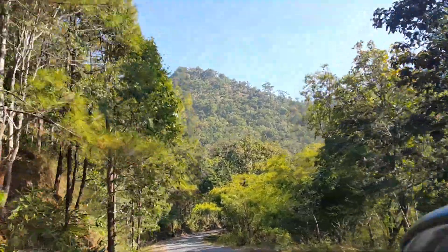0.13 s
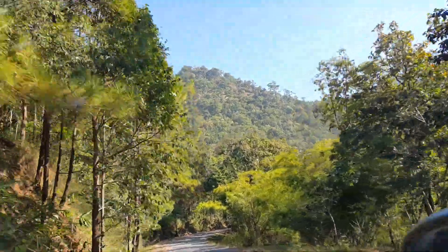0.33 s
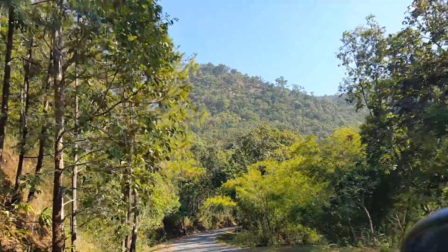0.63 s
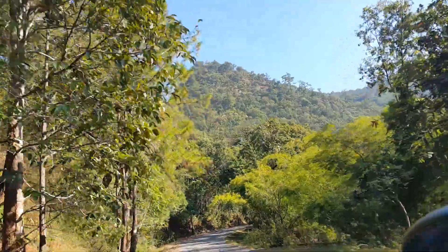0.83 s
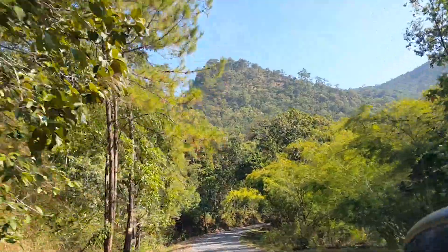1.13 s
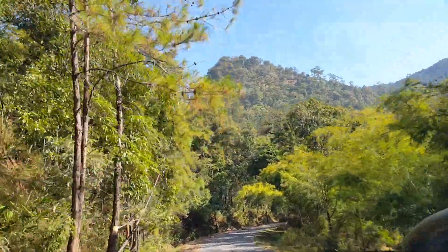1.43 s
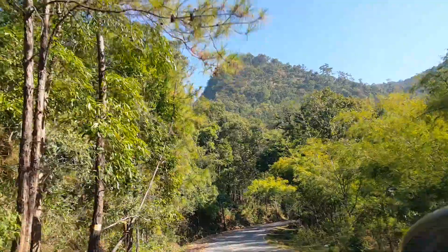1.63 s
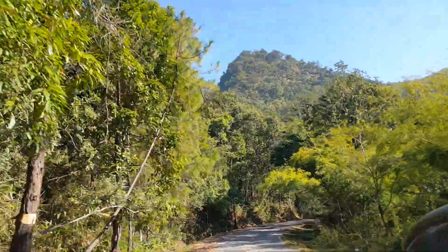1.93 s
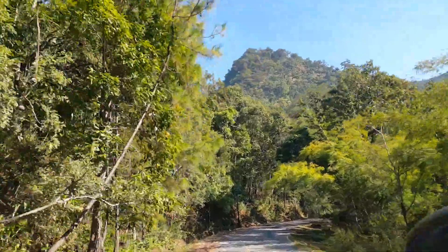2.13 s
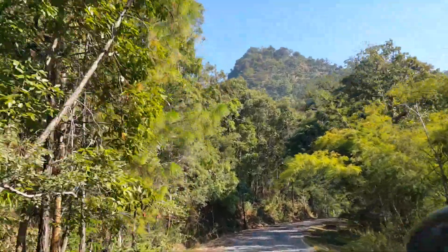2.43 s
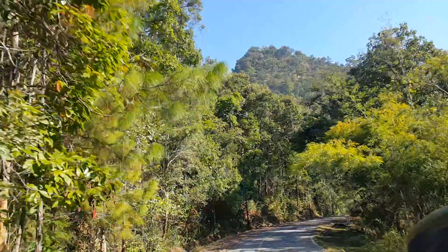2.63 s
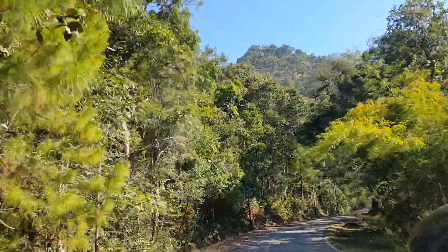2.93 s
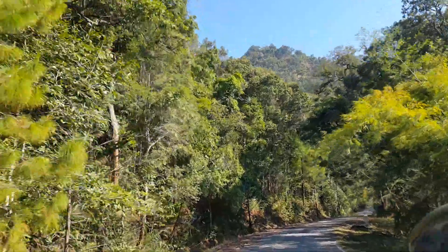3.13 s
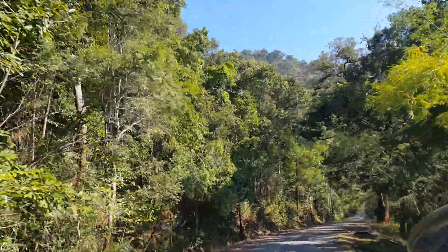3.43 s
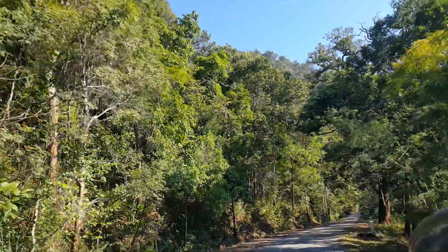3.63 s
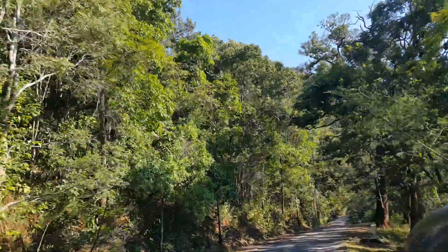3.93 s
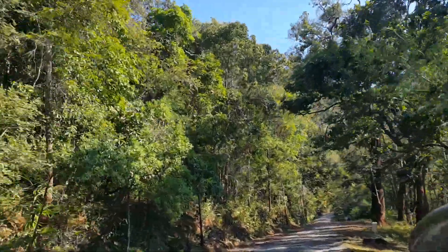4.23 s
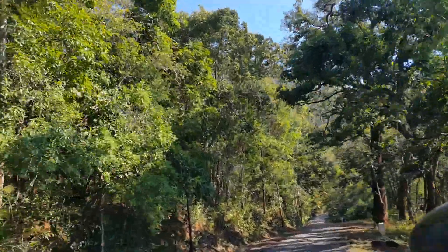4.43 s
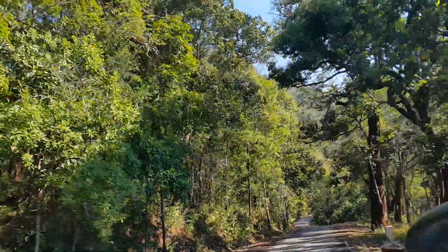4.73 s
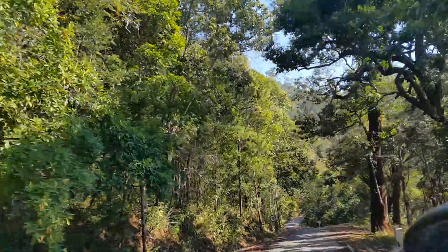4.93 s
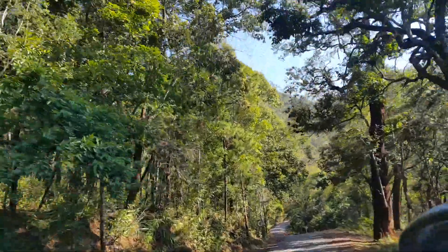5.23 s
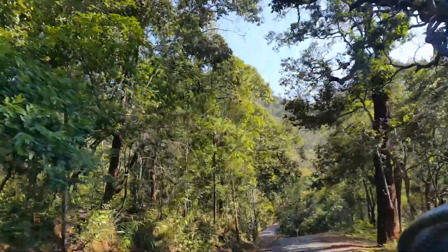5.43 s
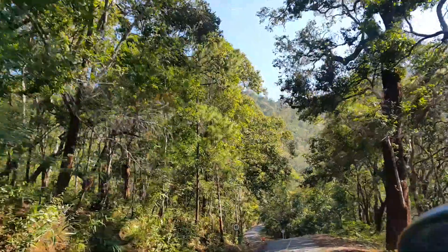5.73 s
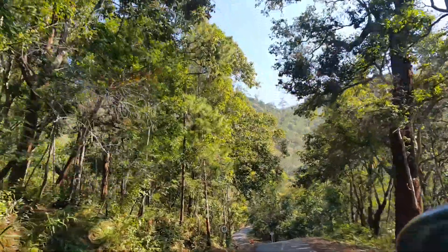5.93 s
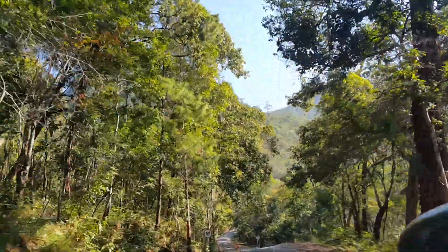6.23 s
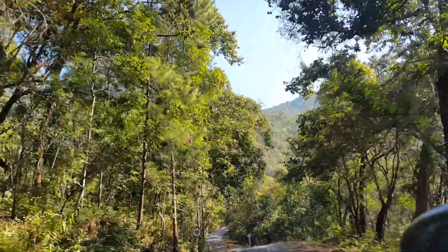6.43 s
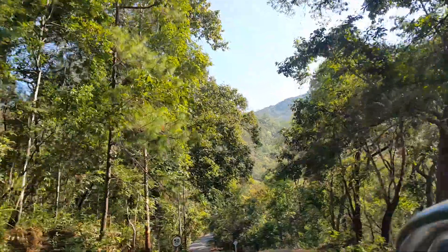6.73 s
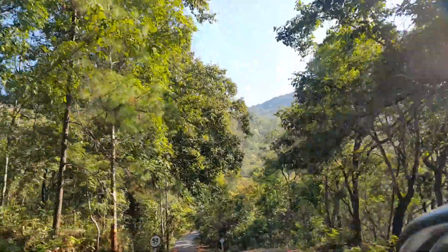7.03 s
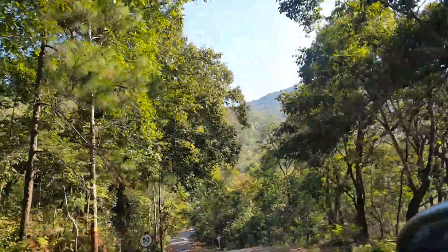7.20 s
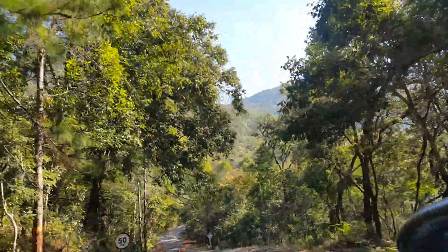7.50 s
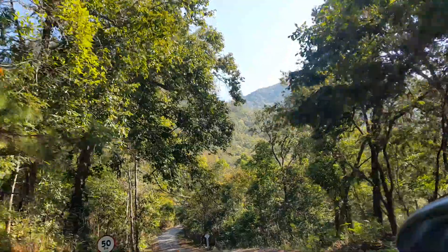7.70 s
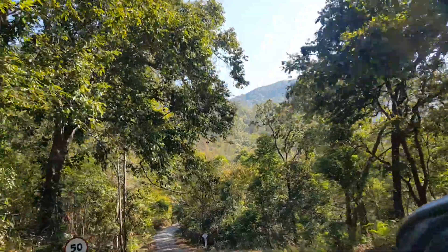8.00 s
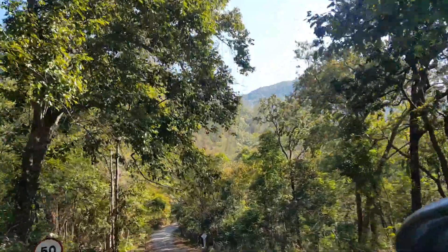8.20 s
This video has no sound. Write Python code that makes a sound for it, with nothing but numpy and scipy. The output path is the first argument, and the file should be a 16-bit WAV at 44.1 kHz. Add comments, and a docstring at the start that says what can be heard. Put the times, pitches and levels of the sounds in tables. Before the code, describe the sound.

Outdoors on a forest road, a microphone on a moving vehicle is held in the airstream. From 0 seconds, low wind rumble and fluttering puffs are broken by irregular short knocks, mostly left, over a muted rush of tyres and air. A faint gear whine near 1.9 kHz and a shrill, chirpy whistle near 3.5 kHz sit behind, with very faint high hiss gliding down. Around 1.3 to 2.1 seconds a gust crunches densely, with heavy thuds on the right, while rush and whistle peak. The whistle weakens after 2 seconds and is practically gone by 4. Hard single pops continue, some with dry crackling edges on the right. From about 5 seconds the thin hiss rises again, then falls after 6. Knocks crowd the right around 7 seconds; the whine sinks and the rush subsides towards 8.4, with wind knocks continuing.

```python
"""A vehicle runs along a forest road, its microphone held out in the airstream: turbulent pressure at two
ports gives a noise rumble, flutter and short shaped knocks, at first mostly left, with a dense gust near 1.7 s.
Filtered noise gives the rush of tyres and air, strongest about then; chirped flecks make a shrill whistle that
fades after it. Narrow noise bands form a gear whine that sinks and a thin hiss that falls, rises again from
about 5 s and falls once more; the knocks grow mostly right, and at the end the rush subsides."""
import sys
import numpy as np
from scipy import signal
from scipy.fft import rfft, irfft, next_fast_len
from scipy.io import wavfile

SR = 44100
rng = np.random.default_rng(int(sys.argv[2]) if len(sys.argv) > 2 else 0)


def persist_wave(psi):
    """Save psi, clipped to +-1, as 16-bit WAV."""
    counts = np.round(np.clip(psi, -1, 1) * 32767).astype(np.int16)
    wavfile.write(sys.argv[1], SR, np.atleast_2d(counts).T)


N = 368668
TIME = np.arange(N) / SR  # s


def gain_of(db):
    """Logarithmic level: converts decibels to an amplitude ratio."""
    return 10 ** (np.asarray(db) / 20)


def evened(x):
    """Power normalization: scales each channel to rms 1."""
    return x / np.sqrt(np.mean(x ** 2, axis=-1, keepdims=True) + 1e-20)


def follow(rows):
    """Linear interpolation: the columns of a time curve at every sample."""
    s, *columns = np.transpose(rows)
    return np.array([np.interp(TIME, s, c) for c in columns])


def colour(x, points):
    """Linear filtering: multiplies the spectrum of x by a gain drawn on a log-frequency axis."""
    size = next_fast_len(x.shape[-1], real=True)
    f, db = np.transpose(points)
    hz = np.fft.rfftfreq(size, 1 / SR)
    gain = gain_of(np.interp(np.log(hz + 1), np.log(f), db))
    return irfft(rfft(x, size) * gain, size)[..., :x.shape[-1]]


def wander(rate_hz):
    """Band-limited random fluctuation: Gaussian-lowpassed noise of rms 1, independent at each port."""
    size = next_fast_len(N, real=True)
    hz = np.fft.rfftfreq(size, 1 / SR)
    lowpass = np.exp(-.5 * (hz / rate_hz) ** 2)
    return evened(irfft(rfft(rng.standard_normal((2, size))) * lowpass, size)[:, :N])


def sides(left_db):
    """Interchannel level difference: gains of the two ports for a left-minus-right level."""
    return gain_of([[left_db / 2], [-left_db / 2]])


def add(mix, s, sound):
    """Superposition: adds a sound to one channel, centred on the time s."""
    start = round(s * SR) - len(sound) // 2
    sound = sound[max(-start, 0):]
    part = mix[max(start, 0):][:len(sound)]
    part += sound[:len(part)]


def fuzzy_tone(rows, width_hz, left_db):
    """Quadrature modulation: random sidebands widen a gliding tone into a narrow band of noise."""
    hz, db = follow(rows)
    phase = 2 * np.pi * np.cumsum(hz) / SR
    band = wander(width_hz) * np.cos(phase) + wander(width_hz) * np.sin(phase)
    return gain_of(db) * sides(left_db) * band


def snaps(rows, half_s, octaves):
    """Time-frequency localization: very short sprays of noise, each about its own centre frequency."""
    size = 1024
    t, hz = (np.arange(size) - size // 2) / SR, np.fft.rfftfreq(size, 1 / SR)
    envelope = np.exp(-.5 * (t / half_s) ** 2)
    out = np.zeros(N)
    for (s, db, centre_hz), chance in zip(rows, rng.standard_normal((len(rows), size))):
        band = np.exp(-.5 * (np.log2((hz + 1) / centre_hz) / octaves) ** 2)
        add(out, s, gain_of(db) * evened(irfft(rfft(chance) * band)) * envelope)
    return out


def bursts(rows, left_steepness=4.88, right_steepness=5.67, squareness=1.55, attack=3.8, extent=1.69,
           leak_hz=70, edge_s=0.00076, lead=0.78, ceiling=0.84, soft_hz=4200):
    """Turbulent pressure at one port: each eddy is a noise body of milliseconds with one early crisp edge."""
    # response of the ports: f/Hz, relative level/dB
    port_colour = [(20, -35), (60, -19), (120, 0.5), (220, -0.5), (1400, -2.5), (2000, -3), (3000, -8.5),
                   (4000, -14.5), (5000, -28.5), (6500, -40), (16000, -44.5)]
    # spectrum of the crisp edge: f/Hz, relative level/dB
    edge_colour = [(300, -23), (900, -3), (1600, 10), (2200, 4), (3000, -4), (4000, -18.5), (5000, -37.5),
                   (6500, -51.5), (16000, -51.5)]
    s, port, db, half, bright_hz = np.transpose(rows)[:, :, None]

    # the edge's share rises with brightness and falls with level
    crisp_db = db - 26 + 21 * np.log2(bright_hz / 758)  # 21 dB per octave
    crisp_db = crisp_db - 0.38 * (db + 11.5)  # dB per dB above -11.5 dB
    crisp_db = crisp_db + 1.0 * rng.standard_normal(db.shape)  # scatter, dB

    size = 2048
    coarse, fine = rng.standard_normal((len(rows), 2, size)).swapaxes(0, 1)
    t, hz = (np.arange(size) - size // 2) / SR, np.fft.rfftfreq(size, 1 / SR)

    def sized(x, level_db, half_s):
        """Energy equivalence: gives each row the energy of a bell of that height and half length."""
        bell = np.sqrt(np.sqrt(2 * np.pi) * half_s * SR / size)
        return gain_of(level_db) * bell * evened(x)

    shape = np.where(t < 0, attack * squareness, squareness)  # it starts more abruptly than it ends
    swirl = rfft(coarse * np.exp(-abs(t / (extent * half)) ** shape))
    steepness = np.where(port > .5, right_steepness, left_steepness)
    swirl /= np.sqrt(1 + (hz / bright_hz) ** steepness)  # brighter eddies reach higher
    body = colour(irfft(swirl), port_colour)
    body = signal.lfilter(*signal.butter(2, leak_hz, "high", fs=SR), body)  # slow swing back

    age = t + lead * half  # the edge comes early and dies away
    edge_envelope = np.exp(-np.maximum(age, -1.8 * age) / np.sqrt(edge_s * half))
    edge = colour(fine * edge_envelope, edge_colour)
    sound = sized(body, db, half) + sized(edge, crisp_db, half)

    # the narrow port rounds off the largest swings; only the lower part of that change is kept
    pressed = ceiling * np.tanh(sound / ceiling) - sound
    sound = sound + signal.sosfiltfilt(signal.butter(2, soft_hz, fs=SR, output="sos"), pressed)
    out = np.zeros((2, N))
    for when, side, one in zip(s[:, 0], port[:, 0], sound):
        add(out[int(side > .5)], when, one)
    return out


def knocks():
    """Impulsive turbulent pressure: the strongest eddies strike the ports one by one."""
    # strong eddies: t/s, port (0 left, 1 right), relative level/dB, half length/s, brightness f/Hz
    eddies = [(0.0124, 1, -14, 0.0014, 730), (0.023, 0, -24.5, 0.0038, 1320),
              (0.037, 0, -26.5, 0.0033, 1350), (0.105, 0, -19.5, 0.0048, 960), (0.124, 1, -16, 0.0018, 755),
              (0.1484, 0, -18.5, 0.002, 950), (0.18, 0, -11.5, 0.00033, 1560),
              (0.273, 0, -24.5, 0.0024, 1170), (0.306, 1, -7.5, 0.0014, 603),
              (0.3852, 0, -22, 0.0025, 1210), (0.3855, 1, -12, 0.0012, 605), (0.416, 0, -21, 0.0049, 1340),
              (0.4873, 0, -17, 0.0023, 1200), (0.599, 0, -18, 0.0011, 1400), (0.829, 0, -26, 0.0024, 1180),
              (0.8444, 1, -6, 0.00036, 376), (0.8483, 0, -9, 0.00051, 980), (0.89, 0, -21, 0.0054, 1000),
              (0.9585, 0, -12, 0.00078, 1000), (0.9585, 1, -18, 0.00088, 500),
              (0.994, 0, -10.5, 0.0017, 1170), (1.017, 1, -9.5, 0.0011, 430),
              (1.036, 0, -14.5, 0.00075, 970), (1.048, 0, -12, 0.00076, 1090),
              (1.097, 0, -12, 0.00068, 1110), (1.1526, 0, -13, 0.00062, 735),
              (1.213, 0, -14.5, 0.00068, 706), (1.2803, 0, -13.5, 0.0019, 1130),
              (1.371, 0, -23, 0.0031, 1020), (1.392, 0, -8.5, 0.0012, 850),
              (1.412, 0, -11.5, 0.00048, 1060), (1.4355, 1, -12, 0.0014, 520), (1.47, 0, -15, 0.0006, 1160),
              (1.5672, 0, -19, 0.0019, 1130), (1.641, 0, -21.5, 0.0032, 700), (1.657, 1, -10, 0.0024, 540),
              (1.6644, 0, -17, 0.0023, 650), (1.6836, 0, -19.5, 0.0027, 780),
              (1.715, 0, -13.5, 0.0013, 1090), (1.7325, 1, -6.5, 0.0019, 1010),
              (1.752, 0, -14.5, 0.0013, 940), (1.7579, 1, -8, 0.00044, 750), (1.7603, 0, -15, 0.0017, 850),
              (1.78, 1, -11.5, 0.0019, 600), (1.808, 1, -16, 0.00097, 426), (1.875, 0, -14.5, 0.0046, 850),
              (1.8978, 0, -8, 0.00071, 860), (1.928, 0, -6.5, 0.001, 1050), (1.973, 0, -14.5, 0.002, 700),
              (2.006, 0, -16, 0.0034, 1190), (2.024, 0, -9.5, 0.0011, 1560), (2.0603, 1, -12, 0.002, 630),
              (2.0646, 0, -14, 0.0011, 550), (2.103, 0, -13.5, 0.0016, 980), (2.182, 0, -24, 0.0023, 750),
              (2.2089, 0, -23.5, 0.0015, 1200), (2.341, 0, -22.5, 0.0025, 1040),
              (2.537, 1, -12.5, 0.0021, 450), (2.5733, 0, -7, 0.00072, 1350), (2.5782, 1, 1, 0.00059, 690),
              (2.6054, 0, -20.5, 0.0026, 1240), (2.6102, 1, -18.5, 0.0022, 393),
              (2.661, 0, -19.5, 0.0031, 1030), (2.7078, 0, -5, 0.0005, 1340),
              (2.789, 0, -21.5, 0.0031, 1190), (2.818, 0, -14, 0.0021, 860),
              (2.9146, 1, -11.5, 0.0013, 553), (2.967, 0, -18, 0.0024, 680), (2.977, 1, -8.5, 0.0023, 870),
              (3.1526, 1, -3, 0.00052, 450), (3.184, 0, -21, 0.0015, 590), (3.2156, 1, -6, 0.0016, 730),
              (3.2415, 0, -12, 0.00065, 1500), (3.2571, 0, -14, 0.0016, 930), (3.3, 1, -6, 0.0012, 890),
              (3.3732, 1, -18, 0.0028, 600), (3.404, 0, -10.5, 0.0011, 830), (3.4495, 0, -12, 0.0021, 1280),
              (3.474, 0, -19, 0.0017, 1270), (3.504, 1, -12, 0.0016, 710), (3.661, 1, -9, 0.001, 423),
              (3.718, 1, -7.5, 0.0015, 625), (3.777, 0, -18.5, 0.0024, 1030),
              (3.789, 1, -19.5, 0.0014, 800), (3.81, 0, -14, 0.0011, 1100), (3.828, 0, -15.5, 0.0019, 1370),
              (3.832, 1, -21, 0.0012, 1100), (3.8695, 1, -4, 0.002, 940), (3.909, 0, -18.5, 0.0038, 900),
              (3.942, 1, -11.5, 0.0023, 1070), (4.038, 0, -17.5, 0.0029, 1020),
              (4.039, 1, -13.5, 0.0021, 505), (4.053, 1, -11, 0.00083, 403),
              (4.0763, 0, -12, 0.00045, 1480), (4.0927, 0, -24, 0.0021, 680),
              (4.1076, 0, -19.5, 0.0018, 1000), (4.1315, 0, -16.5, 0.0032, 1170),
              (4.191, 0, -15.5, 0.001, 780), (4.257, 1, -21, 0.0025, 364), (4.318, 1, -10, 0.0014, 344),
              (4.4057, 0, -21, 0.0017, 920), (4.473, 0, -17.5, 0.0024, 1360),
              (4.541, 1, -4.5, 0.00083, 397), (4.59, 0, -10.5, 0.00069, 940),
              (4.641, 0, -15.5, 0.0012, 1020), (4.727, 0, -23, 0.0066, 950), (4.746, 1, -9, 0.00074, 540),
              (4.8856, 1, -12, 0.0026, 850), (4.89, 0, -20, 0.0023, 600), (4.907, 1, 0, 0.00086, 1120),
              (4.9223, 1, -10.5, 0.0011, 590), (4.951, 0, -22, 0.0037, 860), (4.9696, 0, -19, 0.0019, 880),
              (5.007, 1, -13.5, 0.00088, 745), (5.009, 0, -15, 0.0008, 920), (5.0697, 0, -23, 0.0018, 1100),
              (5.0835, 1, -15, 0.002, 1090), (5.098, 1, -20, 0.0045, 800), (5.2586, 1, -17, 0.0026, 970),
              (5.284, 0, -10.5, 0.00094, 920), (5.32, 1, -0.5, 0.0017, 524), (5.4746, 1, -24, 0.0028, 960),
              (5.511, 1, -16.5, 0.0029, 660), (5.5308, 1, -6.5, 0.0016, 825), (5.5756, 1, -6, 0.0016, 674),
              (5.606, 1, -10.5, 0.001, 430), (5.61, 0, -18.5, 0.0012, 680), (5.6393, 1, -6.5, 0.0017, 870),
              (5.6934, 0, -20.5, 0.0015, 1200), (5.7075, 0, -25.5, 0.0029, 1400),
              (5.7264, 1, -22.5, 0.0055, 794), (5.738, 1, -7.5, 0.0026, 1060), (5.848, 1, -8.5, 0.002, 770),
              (5.8748, 1, -20.5, 0.0015, 750), (5.949, 1, -11.5, 0.0014, 380), (5.967, 1, -6, 0.0016, 1000),
              (6.0568, 1, -6, 0.0011, 720), (6.0655, 1, -15, 0.0013, 1200), (6.101, 1, -13, 0.0014, 510),
              (6.128, 1, -23, 0.0015, 780), (6.154, 1, -11.5, 0.0011, 960), (6.1776, 1, -4, 0.0014, 564),
              (6.1785, 0, -16.5, 0.0018, 1120), (6.2107, 1, -10.5, 0.0011, 517),
              (6.2182, 0, -13, 0.0005, 1170), (6.312, 1, -14, 0.0022, 495), (6.35, 0, -19.5, 0.0016, 670),
              (6.369, 0, -28, 0.002, 950), (6.3893, 1, -15, 0.003, 1030), (6.478, 1, -10.5, 0.0026, 700),
              (6.484, 1, -11, 0.0019, 1020), (6.6098, 1, -9, 0.002, 1460), (6.6618, 1, -20, 0.0021, 680),
              (6.6775, 0, -22, 0.00065, 1450), (6.7074, 1, -10, 0.00076, 490), (6.721, 0, -20, 0.0018, 920),
              (6.7365, 1, -6.5, 0.0014, 960), (6.8174, 1, -17, 0.0017, 520), (6.854, 1, -8, 0.0014, 695),
              (6.8832, 0, -28, 0.0038, 1210), (6.8833, 1, -9.5, 0.0031, 873),
              (6.8923, 0, -23, 0.00081, 1330), (6.901, 1, -8.5, 0.0035, 540),
              (6.923, 1, -6.5, 0.00066, 805), (6.9277, 0, -16, 0.0012, 890), (6.945, 1, -17, 0.0019, 950),
              (6.954, 1, -9.5, 0.00094, 790), (6.98, 0, -10, 0.00044, 1110), (6.992, 1, -2.5, 0.0014, 970),
              (7.0144, 0, -16, 0.003, 1320), (7.0372, 0, -23, 0.0025, 1060), (7.086, 0, -13, 0.0014, 690),
              (7.126, 1, -3, 0.0019, 880), (7.151, 1, -6, 0.0012, 850), (7.162, 0, -16, 0.0025, 940),
              (7.202, 0, -20, 0.0018, 1350), (7.2172, 0, -18.5, 0.0027, 680), (7.223, 1, -5.5, 0.0011, 770),
              (7.2309, 0, -23, 0.00083, 1280), (7.246, 0, -19, 0.0026, 754),
              (7.2806, 1, -15.5, 0.0024, 940), (7.301, 1, -13, 0.0036, 620), (7.388, 1, -17.5, 0.0024, 540),
              (7.4267, 0, -22, 0.0028, 1220), (7.448, 1, -21, 0.0023, 700), (7.4655, 0, -27, 0.0018, 1150),
              (7.516, 0, -14.5, 0.0014, 920), (7.573, 1, -4.5, 0.0016, 1080),
              (7.584, 1, -6.5, 0.00081, 1140), (7.6223, 1, -16, 0.001, 520), (7.6421, 1, -8, 0.0013, 564),
              (7.672, 1, -18, 0.0011, 850), (7.6915, 1, -4, 0.0015, 900), (7.74, 1, -11.5, 0.0012, 714),
              (7.7959, 1, -9.5, 0.0011, 510), (7.7987, 0, -15, 0.00083, 1000),
              (7.8555, 1, -7.5, 0.0014, 1190), (7.863, 1, -6, 0.002, 1150), (7.9113, 1, -11, 0.00099, 584),
              (7.981, 0, -20, 0.0019, 683), (7.9833, 1, -20, 0.0025, 345), (8.0546, 0, -24.5, 0.0018, 750),
              (8.118, 1, -7.5, 0.0019, 740), (8.158, 0, -14, 0.00045, 1040), (8.166, 1, -11.5, 0.0021, 910),
              (8.2232, 1, -6.5, 0.002, 920), (8.2442, 0, -13.5, 0.0013, 1030), (8.261, 1, -17, 0.0025, 606),
              (8.295, 0, -23.5, 0.0011, 1400), (8.301, 1, -11, 0.0013, 710)]
    return bursts(eddies)


def shoves(cycles=0.37):
    """Inertial displacement of air: the largest eddies push a port one way, then back, as a dull thud."""
    # heavy shoves of air: t/s, port (0 left, 1 right), relative level/dB, swing f/Hz
    pushes = [(1.4923, 0, -9, 150), (1.635, 1, -8, 218), (1.685, 1, -11, 332), (1.7292, 1, -4.5, 165),
              (1.7817, 1, -5, 418), (1.8075, 1, -3.5, 190), (1.82, 1, -13, 171), (2.017, 1, -19, 180),
              (2.1779, 1, -10.5, 170), (2.9789, 1, -5.5, 303), (3.047, 1, -10, 274), (3.154, 1, -9, 258),
              (3.219, 1, -1.5, 205), (3.244, 0, -12, 210), (3.4007, 0, -12.5, 200), (3.7829, 1, -8, 190),
              (4.0557, 1, -6, 200), (4.5413, 1, -10, 240), (4.7134, 1, -12, 190), (4.7583, 1, -12, 232),
              (5.0817, 1, -7, 180), (5.3241, 1, -7.5, 392), (5.6423, 1, -5, 217), (6.207, 1, -8, 200),
              (7.385, 1, -11.5, 201), (7.8285, 1, -12, 180)]
    out, t = np.zeros((2, N)), np.arange(-1024, 1024) / SR
    for s, port, db, hz in pushes:
        swing = np.sin(2 * np.pi * hz * t) * np.exp(-.5 * (hz * t / cycles) ** 2)
        add(out[int(port > .5)], s, gain_of(db) * swing)
    return out


def cracks(crack_hz=4400, spray_hz=12500, wide_hz=8000, wide_db=-16.0):
    """Overload distortion: hard knocks at the right port add a dry crack, a wide skirt and a treble spray."""
    # overloads of the right port: t/s, dry crack level/dB, bright spray level/dB
    overloads = [(2.577, -40, -58), (3.216, -39, -47), (3.871, -35, -52), (4.9075, -51, -75),
                 (5.3215, -40, -64), (5.575, -44, -62), (5.6385, -38, -52), (5.642, -38, -33.5),
                 (5.741, -44, -59), (6.61, -46, -68), (6.737, -46, -56), (6.882, -37, -53),
                 (6.992, -34.5, -53), (7.125, -47, -55), (7.5723, -32.5, -53), (7.857, -45, -57)]
    crack = snaps([(s, db, crack_hz) for s, db, _ in overloads], half_s=0.00035, octaves=0.24)
    skirt = snaps([(s, db + wide_db, wide_hz) for s, db, _ in overloads], half_s=0.0003, octaves=0.55)
    spray = snaps([(s, db, spray_hz) for s, _, db in overloads], half_s=0.00042, octaves=0.22)
    return crack + skirt + spray


def gust(at_s=1.73, length_s=0.78, peak_db=-29.5, fade_db=5.0, spread_db=6.0,
         left_hz=980, right_hz=560, half_s=0.0008, count=130):
    """Turbulent breakup: one long gust becomes a dense crunch of tiny eddies, hardest at its middle."""
    place = 2 * (np.arange(count) + rng.random(count)) / count - 1  # -1 start, 1 end
    port = rng.random(count) < .35  # about a third on the right
    db = peak_db - fade_db * place ** 2
    db = db + spread_db * np.clip(rng.standard_normal(count), -2, 2)
    s = at_s + place * length_s / 2
    hz = np.where(port, right_hz, left_hz)
    return bursts(np.transpose([s, port, db, np.full(count, half_s), hz]))


def airflow(gust_db=2.5, gust_hz=3.3):
    """Unsteady flow: the wind level at each port in dB, slow swells with quick gusts on top."""
    # strength of the buffeting before gusts: t/s, left relative level/dB, right relative level/dB
    swell = [(0.0, -30.5, -31), (0.64, -33, -34.5), (0.96, -29, -30.5), (1.12, -31.5, -36),
             (1.3, -28, -30.5), (1.5, -23, -29.5), (1.7, -27.5, -28.5), (1.95, -25, -26.5), (2.4, -29, -32),
             (4.0, -29.5, -29.5), (4.48, -30.5, -34), (4.8, -33.5, -30.5), (5.28, -27.5, -30.5),
             (5.44, -33, -32), (6.56, -30, -32), (6.88, -33, -26.5), (7.52, -26, -29.5), (7.84, -27.5, -31),
             (8.0, -34.5, -34), (8.32, -30, -35.5)]
    return follow(swell) + gust_db * np.clip(wander(gust_hz), -2, 2)


def patter(wind_db, level_db=-2.0, spread_db=0.5, most_db=2.0, top_db=-22.0, left_hz=830, right_hz=440,
           spread=0.22, half_s=0.0012, clump_db=4.0, clump_hz=14, count=600):
    """Intermittency of turbulence: lesser eddies come in uneven clumps, their level following the wind."""
    density = gain_of(clump_db * np.clip(wander(clump_hz)[0], -2, 1.5))
    arrivals = np.cumsum(density)
    s = np.interp((np.arange(count) + rng.random(count)) / count, arrivals / arrivals[-1], TIME)
    port = rng.integers(0, 2, count)
    long, bright = np.clip(rng.standard_normal((count, 2)), -2, 2).T
    extra_db = np.minimum(spread_db * rng.exponential(1, count), most_db)  # a few stand out
    db = np.minimum(wind_db[port, (s * SR).astype(int)] + level_db + extra_db, top_db)
    hz = np.where(port, right_hz, left_hz) * np.exp(spread * bright)
    return bursts(np.transpose([s, port, db, half_s * np.exp(0.086 * long), hz]))


def buffeting(wind_db, rumble_db=-0.5, flutter_db=-5.0, lumpy_db=5.5, gusty_db=11.5,
              flutter_hz=65, ceiling=1.62):
    """Eddy scale sets the spectrum: large eddies rumble, small ones flutter in uneven puffs, more on the left."""
    # rumble spectrum: f/Hz, relative level/dB
    rumble_colour = [(20, -30.5), (32, -21), (50, -15.5), (70, -7), (100, -4), (160, -6.5), (250, -10.5),
                     (450, -17), (1000, -34), (3000, -77.5)]
    # flutter spectrum: f/Hz, relative level/dB
    flutter_colour = [(30, -32), (80, -15), (160, -5), (300, -0.5), (500, 0.5), (750, -3), (1000, -8),
                      (1600, -18), (2500, -28), (3600, -48.5), (5000, -47), (6500, -69.5)]
    puffs = ceiling * np.tanh(wander(flutter_hz) / ceiling)
    rumble = evened(colour(rng.standard_normal((2, N)) * gain_of(lumpy_db * puffs), rumble_colour))
    flutter = evened(colour(rng.standard_normal((2, N)) * gain_of(gusty_db * puffs), flutter_colour))
    mix = gain_of(rumble_db) * sides(left_db=-5.0) * rumble
    mix = mix + gain_of(flutter_db) * sides(left_db=7.0) * flutter
    return gain_of(wind_db) * mix


def ticks(level_db=-18.0):
    """Short transients have broad spectra: sharp little ticks of noise, mostly on the left."""
    # ticks: t/s, relative level/dB, centre f/Hz
    tick_rows = [(0.020, -25, 3780), (0.035, -33, 3900), (0.599, -24, 2880), (0.994, -17, 2880),
                 (2.573, -24.5, 4050), (2.7075, -27, 3980), (2.7895, -27, 4000), (3.241, -27, 3300),
                 (3.4765, -24, 3860), (3.769, -47, 8800), (3.953, -49, 8800), (4.0762, -42, 3280),
                 (4.849, -49, 9500), (5.033, -52, 10000), (5.122, -49, 8900), (7.200, -29.5, 3880),
                 (7.282, -52, 9000), (7.388, -47, 8400), (7.704, -54, 9300)]
    return gain_of(level_db) * sides(left_db=19.0) * snaps(tick_rows, half_s=0.00057, octaves=0.12)


def rush(level_db=29.0, shade_db=-28.0, shade_hz=1300):
    """Broadband flow and rolling noise: the roar of tyres and air, its treble shaded at the right port."""
    # course of the rush: t/s, relative level/dB
    course = [(0.0, -66), (0.84, -66.5), (1.68, -60), (3.03, -66), (4.94, -66.5), (6.45, -69.5),
              (7.66, -66.5), (7.94, -71), (8.36, -74)]
    # spectrum of the rush: f/Hz, relative level/dB
    rush_colour = [(30, -12.5), (200, -0.5), (700, 1), (1100, -9), (2000, -15), (3000, -17.5), (3600, -19),
                   (4500, -27), (5500, -38), (6700, -46), (10000, -47), (12700, -43), (14500, -49.5),
                   (15600, -46.5)]
    patches = gain_of(1.1 * wander(30))  # slight unevenness
    left, right = colour(rng.standard_normal((2, N)) * patches, rush_colour)
    dull = signal.lfilter(*signal.butter(1, shade_hz, fs=SR), right)
    right = dull + gain_of(shade_db) * (right - dull)
    return gain_of(follow(course) + level_db) * np.array([left, right]) / np.std(left)


def whine(level_db=-2.5, broken_db=2.5, broken_hz=9):
    """Gear-mesh tone: its pitch sinks as the vehicle slows, and its level comes and goes."""
    # gear whine: t/s, pitch f/Hz, relative level/dB
    gear = [(0, 1913, -56), (.9, 1880, -56), (2.4, 1813, -55), (3.3, 1766, -68.5), (4.3, 1750, -54),
            (5.8, 1755, -66), (7, 1724, -57.5), (8.36, 1544, -67.5)]
    breaks = evened(gain_of(broken_db * np.clip(wander(broken_hz), -2, 1.2)))
    return gain_of(level_db) * fuzzy_tone(gear, width_hz=24, left_db=8.5) * breaks


def chirping(level_db=-9.5, spread_db=2.0, scatter_hz=75, glide_hz_per_s=2500, half_s=0.005,
             fuzz=1.0, count=900):
    """Linear frequency modulation: a shrill whistle of short flecks, each with its own pitch and glide."""
    # shrill whistle: t/s, pitch f/Hz, relative level/dB
    shrill = [(0, 3490, -55), (.8, 3590, -55.5), (1.7, 3550, -47.5), (2.25, 3560, -59), (2.6, 3500, -54),
              (3.3, 3520, -67), (5, 3360, -70), (8.36, 3490, -89)]
    hz, db = follow(shrill)
    out, t = np.zeros(N), np.arange(-1500, 1500) / SR
    envelope = np.exp(-.5 * (t / half_s) ** 2)
    places = ((np.arange(count) + rng.random(count)) * (N - 1) / count).astype(int)
    scatter = np.clip(rng.standard_normal((count, 3)), -1.6, 1.6)
    for at, (pitch, glide, strength) in zip(places, scatter):
        turns = (hz[at] + scatter_hz * pitch) * t + glide_hz_per_s * glide * t ** 2 / 2
        fleck = np.cos(2 * np.pi * turns) * envelope
        add(out, at / SR, gain_of(db[at] + spread_db * strength) * fleck)
    return gain_of(level_db) * sides(left_db=16.5) * out * (1 + fuzz * wander(90)[0])


def thin_hiss():
    """Narrow-band noise: a high hiss glides in pitch while its level flickers."""
    # thin hiss: t/s, centre f/Hz, relative level/dB
    glide = [(0, 14800, -82), (.5, 13900, -83), (1, 12400, -86), (1.6, 11500, -75), (2.2, 11280, -91),
             (3, 11740, -95), (4.9, 11100, -95), (5.3, 11830, -79), (5.9, 13700, -85.5),
             (6.35, 13300, -82.5), (6.7, 12000, -87), (7.1, 11300, -84.5), (7.6, 10850, -97)]
    return fuzzy_tone(glide, width_hz=560, left_db=8.5) * evened(gain_of(3.0 * wander(14)))


def swish(left_db=8.0):
    """Amplitude-modulated noise: faint swells of high hiss under bell-shaped envelopes."""
    # swells: t/s, half length/s, centre f/Hz, width f/Hz, relative level/dB
    swells = [(1.66, 0.22, 7500, 3600, -77), (5.13, 0.05, 11000, 2400, -74)]
    out = np.zeros((2, N))
    for s, half, hz, width_hz, db in swells:
        envelope = np.exp(-.5 * ((TIME - s) / half) ** 2)
        out += envelope * fuzzy_tone([(s, hz, db)], width_hz, left_db)
    return out


def self_noise(level_db=-86.5):
    """White noise: the microphone's own steady hiss, independent at each port."""
    return gain_of(level_db) * rng.standard_normal((2, N))


def scene():
    """Superposition: wind on the ports over the running noise."""
    wind_db = airflow()
    wind = knocks() + shoves() + gust() + patter(wind_db) + buffeting(wind_db)
    wind[1] += cracks()
    running = rush() + whine() + chirping()
    high = thin_hiss() + swish() + ticks()
    return wind + running + high + self_noise()


def record(dry, knee=0.8, soft_hz=2600, band_edge_hz=16000):
    """Soft saturation and band limiting: the input rounds off near full scale, then loses its top treble."""
    clean, room = np.clip(dry, -knee, knee), .94 - knee
    pressed = clean + room * np.tanh((dry - clean) / room) - dry
    # smoothing the change keeps the rounding from clicking
    loaded = dry + signal.sosfiltfilt(signal.butter(2, soft_hz, fs=SR, output="sos"), pressed)
    lowpass = signal.firwin(511, band_edge_hz, window=("kaiser", 9), fs=SR)
    return signal.oaconvolve(loaded, lowpass[None], "same")


dry = scene()
out = record(dry)
persist_wave(out)
```